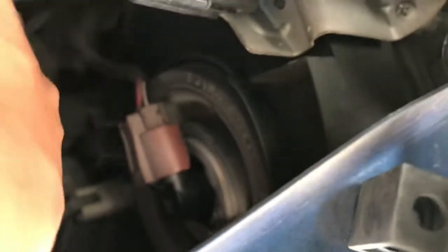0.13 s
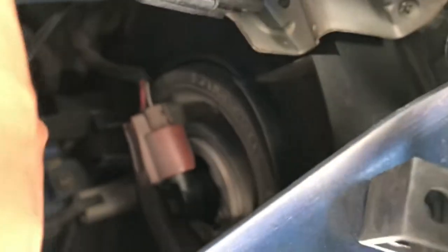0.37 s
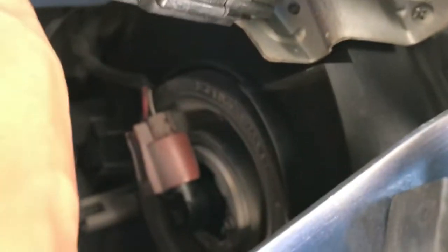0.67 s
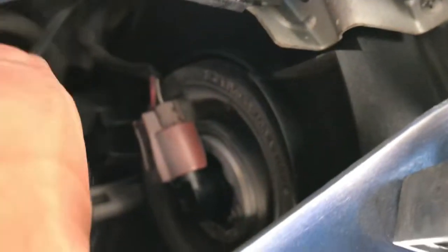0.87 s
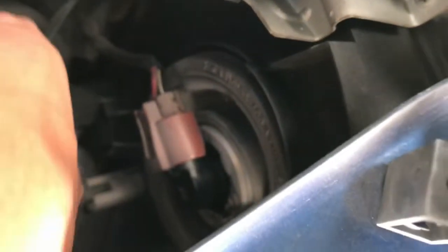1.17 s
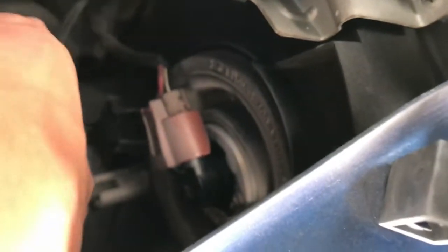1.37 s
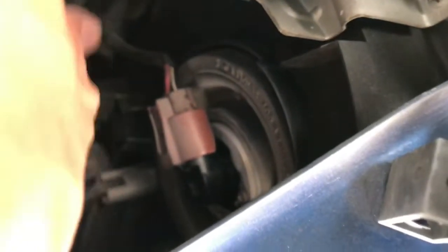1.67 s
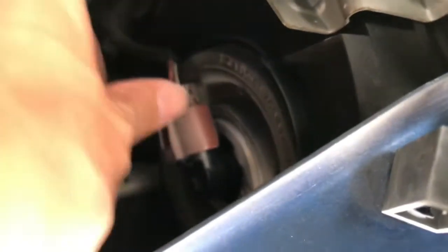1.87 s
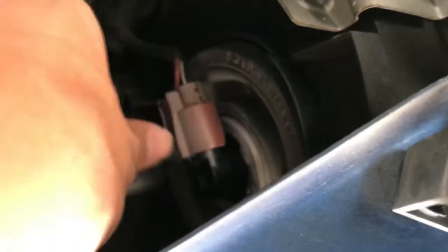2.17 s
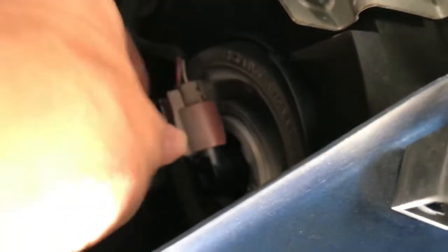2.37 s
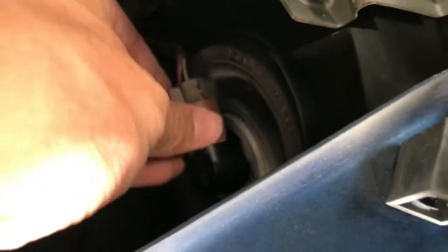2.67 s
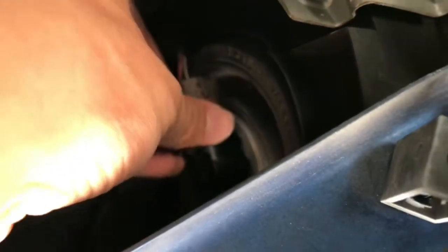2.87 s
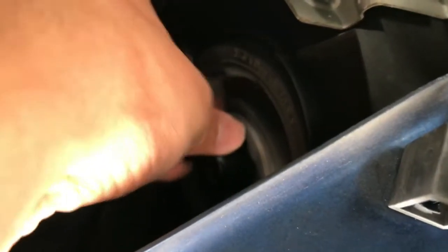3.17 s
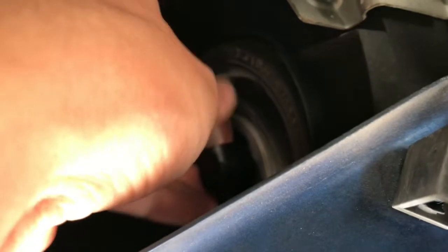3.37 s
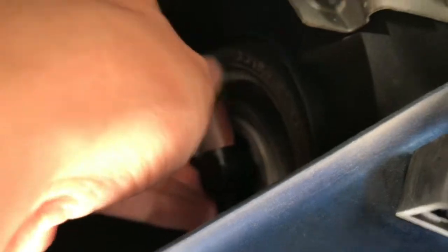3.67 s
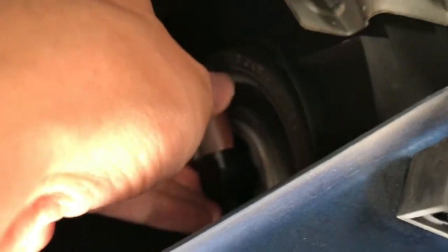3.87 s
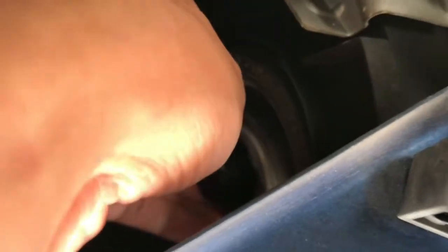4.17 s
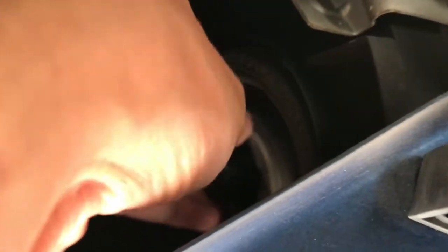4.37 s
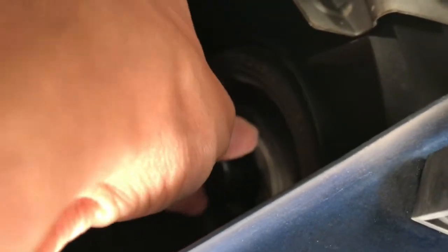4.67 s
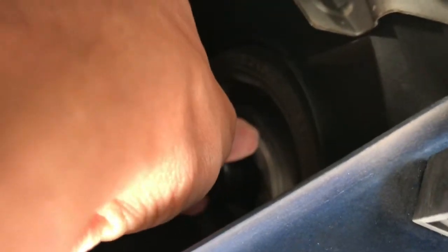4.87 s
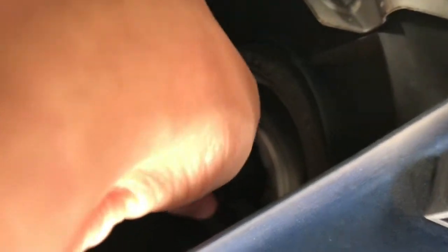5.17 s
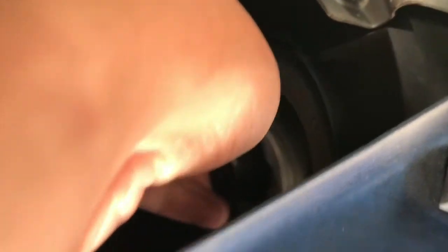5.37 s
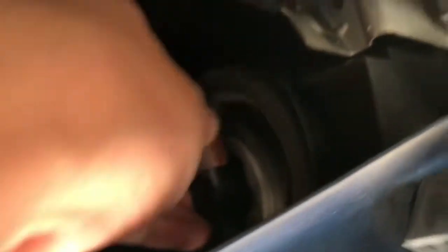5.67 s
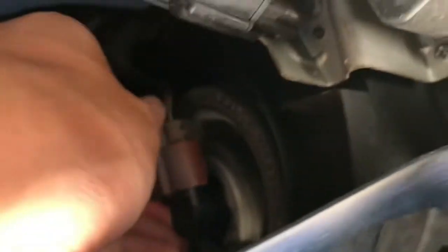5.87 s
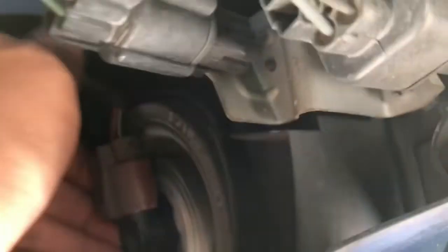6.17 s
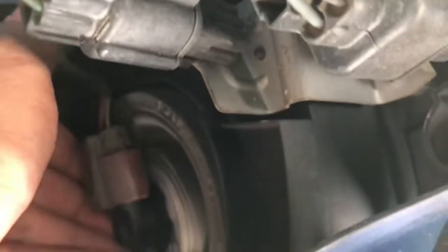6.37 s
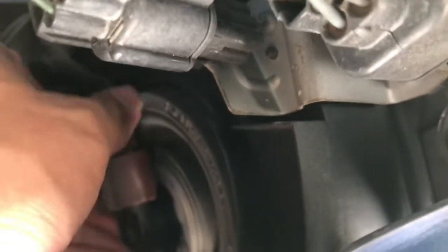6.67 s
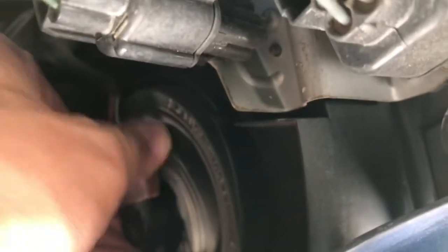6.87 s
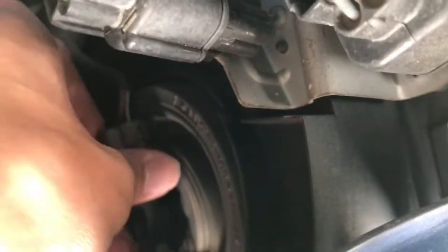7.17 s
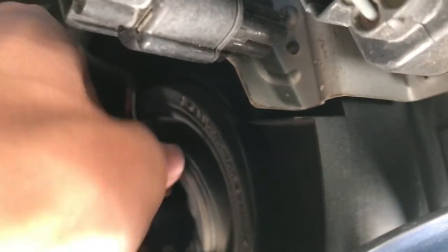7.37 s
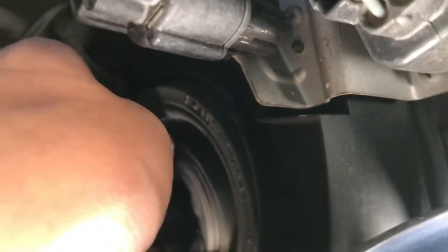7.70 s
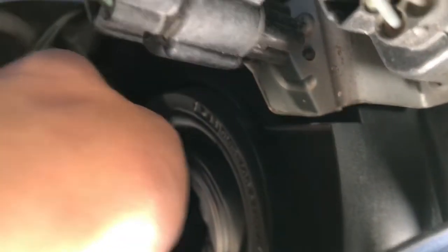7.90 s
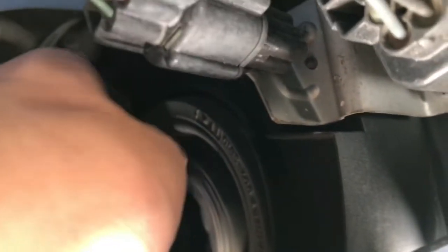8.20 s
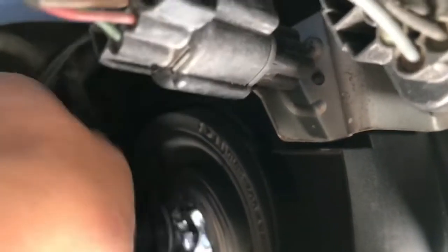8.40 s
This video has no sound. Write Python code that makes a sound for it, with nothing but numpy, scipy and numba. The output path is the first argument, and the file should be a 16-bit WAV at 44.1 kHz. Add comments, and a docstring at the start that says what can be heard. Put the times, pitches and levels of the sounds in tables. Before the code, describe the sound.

Outdoor street with soft low traffic rumble. Hoarse crow caws echo between buildings in two groups of three, with faint small bird whistles. Very near, fingers slide on plastic, land with dull low thumps, and wiggle a bulb plug with small creaking ticks and hard knocks. A small catch snaps loudly just before five seconds; the hardest, loudest clacks rattle out at the very end.

```python
"""Low traffic rumble, and skin rubbing on plastic as a hand works at the back of a car headlamp, close by.
Small birds whistle and a crow caws six times, echoing between houses; among them come clacks, bumps, grabs
and creaking ticks; a connector latch snaps midway, and the loudest bulb clacks come last. Rubs and rumble
are shaped noise, clacks and latch noise bursts with ringing modes, bumps and grabs low modes with a dull
slap, caws pulses through a throat, whistles gliding sines."""
import sys
import numpy as np
from scipy import signal
from scipy.fft import rfft, irfft, next_fast_len
from scipy.io import wavfile
from numba import njit

SR = 44100
rng = np.random.default_rng(int(sys.argv[2]) if len(sys.argv) > 2 else 0)


def waveform_to_disk(signal):
    """Save audio, clipped to [-1, 1], as 16-bit WAV at the path in sys.argv[1]."""
    frames = np.transpose(np.atleast_2d(signal))
    scaled = np.clip(frames, -1, 1) * 32767
    samples = np.round(scaled).astype(np.int16)
    wavfile.write(sys.argv[1], SR, samples)


N = 376613


def undb(db):
    """Decibels to amplitude gain."""
    return 10 ** (np.asarray(db) / 20)


def unit(x):
    """Scale to rms 1."""
    return x / np.sqrt(np.mean(x ** 2) + 1e-20)


def clock(length_s):
    """Sample times in seconds."""
    return np.arange(int(length_s * SR)) / SR


def fade(t, t60_s):
    """Exponential decay, 60 dB down after t60_s."""
    return np.exp(-np.log(1000) * t / t60_s)


def add(out, start_s, x):
    """Mix x into out from start_s, cut at the end of out."""
    i = max(int(start_s * SR), 0)
    out[i:i + len(x)] += x[:max(N - i, 0)]


def walk(rate_hz, size):
    """Random values joined by straight lines, rate_hz per second, spread near 1."""
    knots = rng.standard_normal(size)
    return np.interp(np.arange(size) / SR * rate_hz, np.arange(size), knots) * np.sqrt(3 / 2)


def colour(x, points, tilt_db_per_oct=0):
    """Filter x by (Hz, dB) points plus a tilt, with bass cut below the first point; rms 1."""
    octave = np.log2(np.fft.rfftfreq(len(x), 1 / SR) + 1)
    hz, db = np.transpose(points)
    shape_db = np.interp(octave, np.log2(hz), db)
    shape_db += tilt_db_per_oct * (np.maximum(octave, np.log2(hz[0])) - 10)
    bass_cut = np.minimum(2 ** octave / hz[0], 1) ** 2
    return unit(irfft(rfft(x) * undb(shape_db) * bass_cut, len(x)))


def hiss(points, tilt_db_per_oct=0):
    """Half a second of coloured noise; rms 1."""
    return colour(rng.standard_normal(SR // 2), points, tilt_db_per_oct)


@njit
def resonate(x, hz, width_hz):
    """State-variable band-pass with a moving centre."""
    y, band, low = np.empty(len(x)), 0., 0.
    for i in range(len(x)):
        g, damping = np.tan(np.pi * hz[i] / SR), width_hz / hz[i]
        v = (band + g * (x[i] - low)) / (1 + g * (g + damping))
        band, low, y[i] = 2 * v - band, low + 2 * g * v, damping * v
    return y


def touched(x, hz, boost=3):
    """The part under the finger adds its own broad resonance; rms 1."""
    centre_hz = np.full(len(x), min(hz, .4 * SR))
    return unit(x + boost * resonate(x, centre_hz, .22 * hz))


def ring(modes, t, tilt_db_per_oct=0, scatter_db=2, detune=0.0047):
    """Struck modes as decaying sines; each blow lands on another spot and weights them anew."""
    hz, db, t60_s = np.transpose(modes)[:, :, None]
    weight, shift, side = rng.standard_normal((3, len(modes), 1))
    gain = undb(db + tilt_db_per_oct * np.log2(hz) + scatter_db * weight)
    waves = np.sign(side) * np.sin(2 * np.pi * hz * (1 + detune * shift) * t) * fade(t, t60_s)
    return np.sum(gain * waves, axis=0) / np.sqrt(np.sum(gain ** 2) / 2)


# Spectrum of distant traffic. Each row: frequency in Hz, relative level in dB.
TOWN_SPECTRUM = [(25, -31.5), (40, -0.5), (55, 4.5), (90, 1), (130, -2.5), (200, -7.5), (400, -16.5),
                 (700, -19.5), (1000, -25), (1700, -26.5), (2500, -32), (4000, -36), (8000, -42),
                 (15500, -43)]


def town(wash_db=-43.5, drone_hz=92, width_hz=34.0, drone_db=-49):
    """Distant traffic: a steady noise wash and a low drone, noise band-passed at a wavering centre."""
    wash = colour(rng.standard_normal(next_fast_len(N)), TOWN_SPECTRUM)[:N]
    centre_hz = drone_hz * (1 + 0.072 * walk(3.0, N))
    drone = resonate(rng.standard_normal(N), centre_hz, width_hz)
    drone = resonate(drone, centre_hz, width_hz)
    return undb(wash_db) * wash + undb(drone_db) * unit(drone)


# Spectrum of skin on plastic. Each row: frequency in Hz, relative level in dB.
SKIN_SPECTRUM = [(260, 1.5), (450, 3.5), (1100, 2), (2400, -2), (3300, -5), (4100, -5.5), (5200, -9.5),
                 (6500, -7), (10000, -14), (13000, -15), (16000, -22.5)]


def friction(size, tilt_db_per_oct, part_hz, grain_db=3, catch_db=2.5, boost=1.0):
    """Skin sticks and slips in dense tiny grains; rms 1."""
    slips = rng.standard_normal(size) * undb(grain_db * np.minimum(rng.exponential(size=size), 6))
    slips *= undb(catch_db * walk(122.2, size))
    # reflections between hand and housing colour every stroke differently
    t = clock(.03)
    gap = rng.standard_normal(len(t)) * fade(t, .035)
    slips = unit(slips) + unit(signal.fftconvolve(slips, gap)[:size])
    return touched(colour(slips, SKIN_SPECTRUM, tilt_db_per_oct), part_hz, boost)


# Fingers slide over plastic and let go. Each row: start in seconds, length in seconds, level in dB,
# brightness in dB per octave, resonance of the touched part in Hz.
RUBS = [(0, .12, -45.5, 3, 2420), (0.098, .19, -42, 3, 2270), (0.222, 0.268, -51.5, 3, 1820),
        (0.767, 0.071, -42, 2, 3280), (0.854, 0.085, -43.5, 0, 3940), (1.513, 0.092, -41, 2.5, 3730),
        (1.621, 0.063, -44.5, 1.5, 600), (2.414, 0.091, -39, 1.5, 2190), (3.184, .16, -47.5, 8, 4230),
        (3.342, 0.091, -46, 7, 4280), (3.78, 0.27, -49, -6, 1400), (4.132, 0.28, -48, -3.5, 1060),
        (4.294, 0.13, -48, 2.5, 11500), (5.365, 0.079, -48, 0.5, 7700), (6.064, 0.11, -55.5, 9, 12100),
        (6.803, .11, -44.5, 0, 7000), (7.297, 0.5, -60, 5.5, 8400), (8.218, 0.22, -46, 0, 3370)]


def rubs(peak_share=0.84):
    """Friction under pressure that builds for peak_share of each slide, then the finger lets go."""
    out, t = np.zeros(N), clock(.8)
    for start_s, length_s, db, tilt, part_hz in RUBS:
        pressure = np.interp(t / length_s, [0, peak_share, 1], [0, 1, 0])
        add(out, start_s, undb(db) * friction(len(t), tilt, part_hz) * pressure)
    return out


# Small birds. Each row: start in seconds, source level in dB, first pitch in Hz, held pitch in Hz.
WHISTLES = [(.08, -51, 2590, 2276), (.46, -59, 2650, 2720), (.93, -54, 3456, 3760),
            (1.367, -51.5, 3150, 2433), (1.57, -58.5, 2674, 2820), (2.641, -63.5, 1733, 1684),
            (4.42, -65, 2740, 2630), (6.9, -58, 3300, 3680), (7.17, -61, 3550, 4020)]


def bird(note_s=0.12, glide_s=.04, flutter_db=3, hoarse=.028):
    """Hoarse whistles: sines with jittered pitch, each gliding towards its held pitch."""
    out, t = np.zeros(N), clock(note_s)
    for start_s, db, first_hz, held_hz in WHISTLES:
        hz = held_hz + (first_hz - held_hz) * np.exp(-t / glide_s)
        hz *= 1 + hoarse * walk(719, SR)[:len(t)]
        swell = np.sqrt(2 * np.sin(np.pi * t / note_s))
        flutter = undb(db + flutter_db * walk(68, SR)[:len(t)])
        add(out, start_s, swell * flutter * np.sin(2 * np.pi * np.cumsum(hz) / SR))
    return out


# Caws. Each row: start in seconds, length in seconds, level in dB before effort and street,
# throat resonance in Hz before the glide.
CAWS = [(0.471, 0.26, -34, 1600), (1.14, 0.23, -34, 1563), (1.839, 0.24, -34.5, 1568),
        (4.921, 0.24, -33, 1576), (5.678, 0.21, -32.5, 1575), (6.455, 0.21, -34, 1490)]
# The crow's throat and beak. Each row: multiple of the throat resonance, relative level in dB.
THROAT = [(.45, -43), (.65, 3), (.77, -6.5), (.89, 11), (1.08, 12.5), (1.22, 4.5), (1.38, -11), (2.1, -21),
          (2.5, -23.5), (2.85, -8), (3.15, -15.5), (3.7, -11.5), (5.6, -19), (8, -28)]


def crow(pitch_ratio=.187, rough=.04, rasp=1.0, shimmer_db=4.5):
    """Ragged pulses ring the throat; pitch and resonance rise as the beak opens and sink as it shuts."""
    out, t = np.zeros(N), clock(0.91)
    for start_s, length_s, db, throat_hz in CAWS:
        effort = np.interp(t / length_s, [0, .26, .72, 1], [0.16, 0.59, 0.49, 0.0064])
        turns = np.cumsum(pitch_ratio * throat_hz * (1 + rough * walk(300, len(t)))) / SR
        pulses = np.diff(np.floor(turns), prepend=0)
        breath = rng.standard_normal(len(t)) * np.exp(-3 * (turns % 1))  # bursts after each pulse
        source = unit(pulses) + rasp * unit(breath)
        throat = [(ratio * throat_hz, gain_db) for ratio, gain_db in THROAT]
        voice = colour(source * undb(shimmer_db * walk(221.3, len(t))), throat)
        # playing the voice at a varying speed moves pitch and resonance together
        speed = np.interp(t / length_s, [0, .35, .7, 1], [.9, 1, 1.01, .96])
        add(out, start_s, undb(db) * effort * np.interp(np.cumsum(speed) / SR, t, voice))
    return out


def street(x, direct_db=-5, echo_db=1.5, t60_s=0.72, late_db=-21, late_t60_s=3.1):
    """House fronts scatter far calls into a lingering echo: convolution with decaying noise."""
    t = clock(2)
    echo = colour(rng.standard_normal(len(t)), [(200, 4.5), (6000, -4.5), (16000, -2.5)])
    echo *= fade(t, t60_s) + undb(late_db) * fade(t, late_t60_s)
    echo *= np.minimum(t / 0.0014, 1)
    echo /= np.sqrt(np.sum(echo ** 2))
    return undb(direct_db) * x + undb(echo_db) * signal.fftconvolve(x, echo)[:N]


# Bulb and plug knocking in the seat. Each row: start in seconds, level in dB,
# brightness in dB per octave, housing boom in dB.
CLACKS = [(.810, -28.5, -15.5, 2.5), (.909, -25.5, 0.5, -25), (1.586, -35.5, -11, -4),
          (1.742, -36, -5.5, 1.5), (2.164, -43.5, 6.5, -10), (2.313, -30, 2.5, 8), (2.328, -33, -1, 11.5),
          (2.542, -47.5, -4, 16.5), (2.71, -45, -2, -10), (2.93, -42, -8, -4), (3.260, -35, 7, -1.5),
          (3.678, -35.5, 2.5, 3.5), (4.337, -36, 7, 6.5), (4.382, -30, 8.5, -0.5), (5.602, -37, -3, 11),
          (6.014, -39, 2.5, -18.5), (7.147, -33, 13, -20), (7.806, -32.5, 9, -1), (7.9, -27.5, 3.5, 0),
          (8.145, -36.5, 9, 4), (8.167, -45, 0, 20), (8.3488, -13.5, 0.5, -7.5), (8.358, -16.5, -1, 5.5),
          (8.3763, -3.5, 2, -14), (8.3807, -8.5, -3, 4.5), (8.4018, -3.5, -1.5, -8.5),
          (8.4818, -12, -2, -3), (8.496, -14.5, -1.5, 6)]
# Spectrum of a plastic crack. Each row: frequency in Hz, relative level in dB.
CRACK_SPECTRUM = [(300, -9.5), (1000, -2.5), (1800, -0.5), (2600, -4.5), (3700, -2.5), (5500, -3),
                  (7500, -7.5), (8700, -1.5), (10200, -12.5), (12500, -4.5), (16000, -13.5)]
# What the lamp rings with. Each row: frequency in Hz, relative level in dB, 60 dB decay in seconds.
LAMP_MODES = [(2440, -1, .045), (2500, -4, .045), (2700, -3, .045), (2912, -10, .04), (3420, -1, .035),
              (3560, 1, .035), (4010, -6, .04), (4370, -8, .04), (5130, -6, .03), (5400, -11, .08),
              (6200, -7, .03), (7009, -11, .03), (8680, -8, .05), (12400, -16, .06)]
# What the hollow housing rings with. Each row: frequency in Hz, relative level in dB, 60 dB decay in seconds.
HOUSING_MODES = [(173, 0.5, 0.24), (247, 14, 0.033), (336.3, -3, 0.37), (433, 7.5, 0.11),
                 (522.5, 6.5, 0.15), (639, 7, 0.16), (669, 0.5, 0.22), (760, 6, 0.11), (973, 7.5, 0.071),
                 (1130, 2.5, 0.097), (1320, 10, 0.077), (1313, -32, .07)]


def clacks(strike_db=-3, strike_t60_s=0.003, crack_t60_s=0.025, tail_db=-25, tail_t60_s=0.23,
           ring_db=-2, ring_db_per_db=0.3, boom_db=-8, boom_rise_s=0.0015,
           part_hz=4220, part_oct_per_tilt=0.21):
    """Hard plastic contacts: a bright strike and crack, the lamp's short ring, then the housing builds up."""
    out, t = np.zeros(N), clock(.5)
    for start_s, db, tilt, housing_db in CLACKS:
        strike = undb(strike_db) * hiss(CRACK_SPECTRUM, tilt + 3) * fade(t, strike_t60_s)
        small_hz = part_hz * 2 ** (part_oct_per_tilt * tilt)  # a brighter contact is on a smaller part
        crack = touched(hiss(CRACK_SPECTRUM, tilt), small_hz, boost=3.3) * fade(t, crack_t60_s)
        tail = undb(tail_db) * hiss(CRACK_SPECTRUM, tilt - 3) * fade(t, tail_t60_s)  # treble dies first
        lamp_gain = undb(ring_db + ring_db_per_db * db)  # light ticks hardly ring the lamp
        lamp = lamp_gain * ring(LAMP_MODES, t, tilt, detune=0.0072)
        boom = undb(boom_db + housing_db) * ring(HOUSING_MODES, t, detune=0.026)
        boom *= 1 - np.exp(-t / boom_rise_s)
        onset = np.minimum(t / 0.0012, 1)
        add(out, start_s, undb(db) * (strike + crack + tail + lamp + boom) * onset)
    return out


# Spectrum of flesh slapping the housing. Each row: frequency in Hz, relative level in dB.
SLAP_SPECTRUM = [(60, -39), (170, 8), (320, 0), (450, -12.5), (650, -2.5), (1100, -20.5), (2000, -20.5),
                 (6000, -42)]


def thump(hz, cycles, slap_db, slap_share=0.97, rise_s=0.0013):
    """Flesh meets the housing: a cluster of low panel modes and a dull slap."""
    t, t60_s = clock(.5), cycles / hz  # lower thumps last longer
    modes = [(hz, 0, t60_s), (hz * 0.65, -8, t60_s),
             (hz * 1.55, -7, t60_s * 0.5), (hz * 2.1, -10, t60_s * 0.45)]
    panel = ring(modes, t)
    slap = undb(slap_db) * hiss(SLAP_SPECTRUM) * fade(t, t60_s * slap_share)
    return (panel + slap) * np.minimum(t / rise_s, 1)


# A knuckle or the plug bumps the housing. Each row: start in seconds, level in dB, pitch in Hz.
BUMPS = [(.971, -19.5, 93.7), (1.279, -22, 82.7), (1.662, -30, 98), (2.84, -34.5, 83.4),
         (3.775, -28.5, 292), (4.161, -30, 85), (5.116, -27, 91), (5.748, -31, 96.6), (6.696, -28.5, 382),
         (7.82, -30, 227), (7.933, -34, 168), (8.385, -26.5, 65.4)]


def bumps(decay_cycles=16.5):
    """Single soft knocks on the housing, each one thump."""
    out = np.zeros(N)
    for start_s, db, hz in BUMPS:
        add(out, start_s, undb(db) * thump(hz, decay_cycles, slap_db=-9.5))
    return out


# The hand lands on the lamp. Each row: start in seconds, thump level in dB, thump pitch in Hz,
# skid level in dB, resonance of the touched part in Hz.
GRABS = [(1.149, -17, 120.4, -33.5, 1070), (2.313, -17.5, 135, -29.5, 3800),
         (2.928, -30.5, 112.3, -35, 1560), (3.356, -38.5, 110, -40, 4330), (3.623, -47, 109, -46, 1950),
         (3.812, -56, 109, -45, 1670), (6.241, -23, 100.2, -34, 636), (6.747, -33.5, 112.3, -41.5, 3500)]


def grabs(palm_cycles=34.7, settle_s=.033, settle_db=-4, settle_pitch_ratio=.92, skid_rise_s=0.0027,
          skid_t60_s=0.35, skid_tilt=-0.5, drag_db=-6, drag_t60_s=0.65, drag_tilt=-15):
    """Fingers land, the palm settles just after, softer and lower, and the skin skids to a stop."""
    out, t = np.zeros(N), clock(.8)
    for start_s, thump_db, hz, skid_db, part_hz in GRABS:
        fingers = thump(hz, palm_cycles, slap_db=-10, slap_share=1.04, rise_s=0.006)
        add(out, start_s, undb(thump_db) * fingers)
        palm = thump(hz * settle_pitch_ratio, palm_cycles, slap_db=-13.5)
        add(out, start_s + settle_s, undb(thump_db + settle_db) * palm)
        skid = friction(len(t), skid_tilt, part_hz, catch_db=-0.5) * fade(t, skid_t60_s)
        # dull rubbing outlasts the skid
        drag = friction(len(t), drag_tilt, part_hz, catch_db=6.0) * fade(t, drag_t60_s)
        onset = np.minimum(t / skid_rise_s, 1)
        add(out, start_s, undb(skid_db) * (skid + undb(drag_db) * drag) * onset)
    return out


# The hand is inside the lamp bay. The pair: start in seconds, end in seconds.
HOLD_S = (2.3, 8.4)


def fumble(db=-64, tilt_db_per_oct=-2, part_hz=900, unrest_db=5.5, shifts_per_s=14):
    """The gripping hand never rests: faint dull friction that comes and goes."""
    start_s, end_s = HOLD_S
    size = next_fast_len(int((end_s - start_s) * SR))
    unrest = undb(db + unrest_db * walk(shifts_per_s, size))
    out = np.zeros(N)
    add(out, start_s, friction(size, tilt_db_per_oct, part_hz) * unrest)
    return out


# The fingers strain at the plug. Each row: start in seconds, end in seconds.
STRAINS = [(2.5, 3.6), (3.9, 4.8), (5.0, 5.6), (7.1, 7.85)]


def fidget(ticks_per_strain=18, loudest_db=-46, t60_s=0.014, tilt_db_per_oct=6):
    """Plug and wires creak in faint noise ticks at random times, each with its own strength and colour."""
    out, t = np.zeros(N), clock(.5)
    for start_s, end_s in STRAINS:
        ticks = rng.uniform((start_s, -12, -4), (end_s, 0, 4), (ticks_per_strain, 3))
        for tick_s, softer_db, brighter in ticks:
            tick = hiss(SKIN_SPECTRUM, tilt_db_per_oct + brighter) * fade(t, t60_s)
            add(out, tick_s, undb(loudest_db + softer_db) * tick)
    return out


# Snap and rebounds of the connector latch. Each row: start in seconds, level in dB.
LATCH = [(4.804, -2.5), (4.8047, -23), (4.8084, -17.5)]
# What the latch rings with. Each row: frequency in Hz, relative level in dB, 60 dB decay in seconds.
LATCH_MODES = [(2100, -14, .02), (2560, -14, .018), (2930, -13, .018), (3810, -10, .02), (5550, -9, .012),
               (5910, 0, .019), (6150, -1, .019), (6700, -6, .016), (8830, -4, .017), (9666, -6, .013),
               (12530, -4, .01), (13465, -4, .014), (14350, 1, .008)]


def latch(crack_db=-2, crack_t60_s=0.0082, bay_db=-27, bay_t60_s=0.09):
    """The small catch snaps over and rebounds twice, ringing; the engine bay answers faintly."""
    out, t = np.zeros(N), clock(.5)
    catch = ring(LATCH_MODES, t, scatter_db=0, detune=.002)  # the same ring for every hit
    for start_s, db in LATCH:
        crack = undb(crack_db) * hiss(CRACK_SPECTRUM, 7.1) * fade(t, crack_t60_s)
        bay = undb(bay_db) * hiss(SKIN_SPECTRUM, 0.96) * fade(t, bay_t60_s)
        add(out, start_s, undb(db) * (catch + crack + bay))
    return out


def scene():
    """The hand's work close by, the birds and the town behind it."""
    hand = rubs() + clacks() + bumps() + grabs() + fumble() + fidget() + latch()
    calls = street(bird() + crow())
    return (town() + hand + calls)[None]


def record(dry, low_cut_hz=40, top_hz=15850):
    """The microphone drops the deepest bass, rounds the loudest cracks and cuts the top."""
    low_cut = signal.butter(4, low_cut_hz, "high", fs=SR, output="sos")
    rounded = 1.118 * np.tanh(signal.sosfilt(low_cut, dry) / 1.113)
    top_cut = signal.ellip(8, .2, 70, top_hz, fs=SR, output="sos")
    return signal.sosfilt(top_cut, rounded)


dry = scene()
out = record(dry)
waveform_to_disk(out)
```